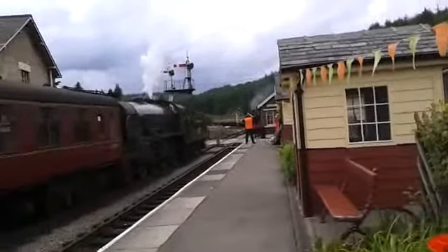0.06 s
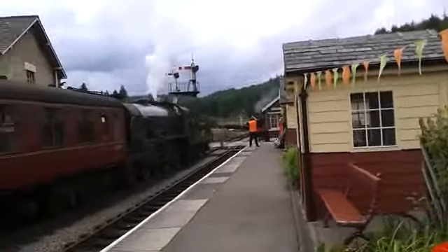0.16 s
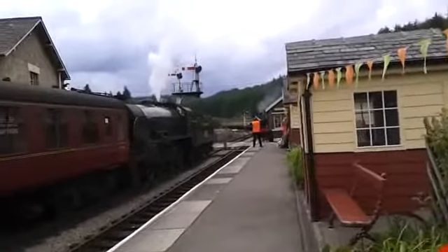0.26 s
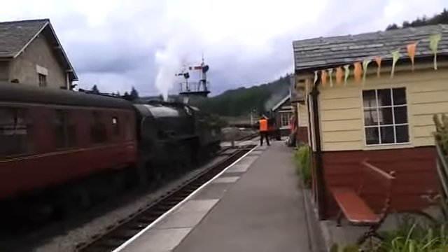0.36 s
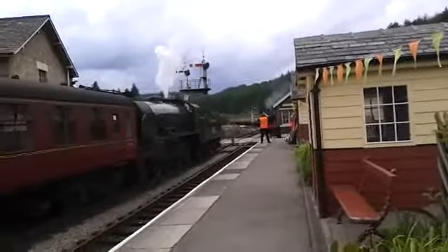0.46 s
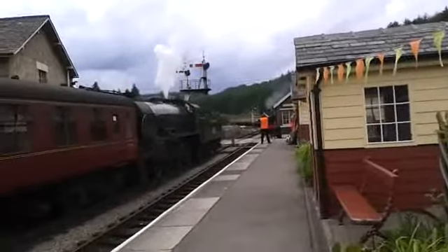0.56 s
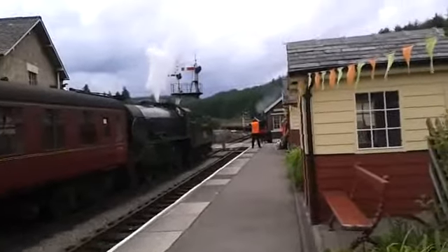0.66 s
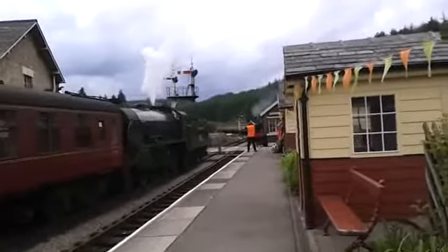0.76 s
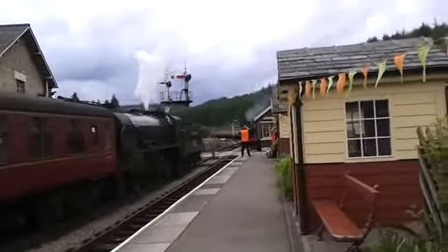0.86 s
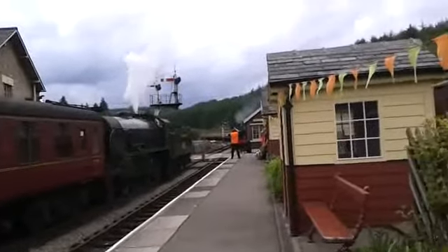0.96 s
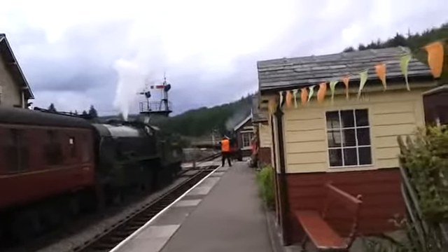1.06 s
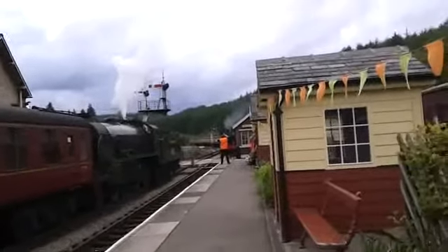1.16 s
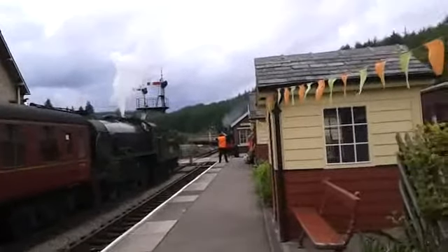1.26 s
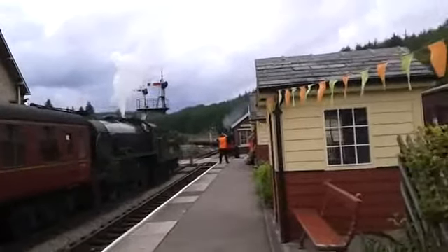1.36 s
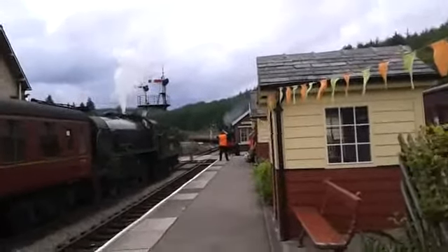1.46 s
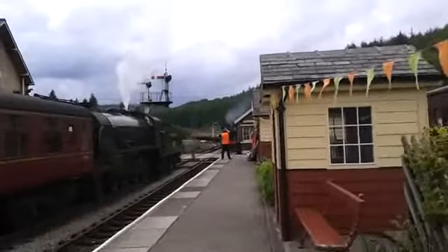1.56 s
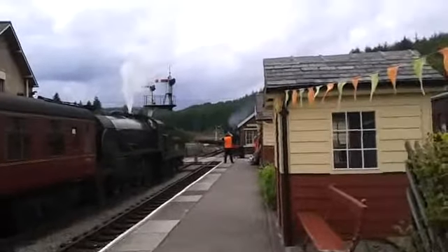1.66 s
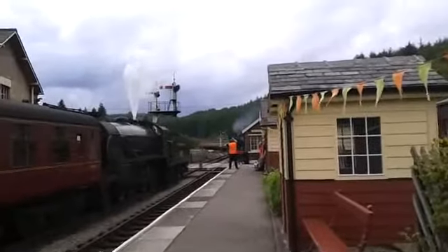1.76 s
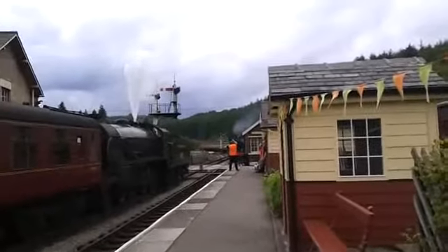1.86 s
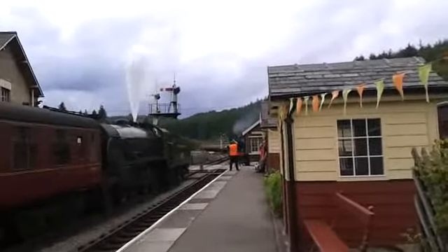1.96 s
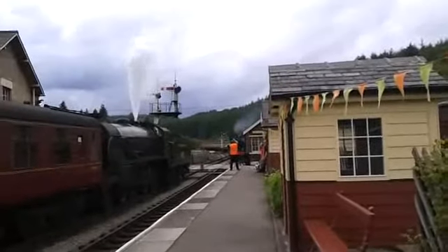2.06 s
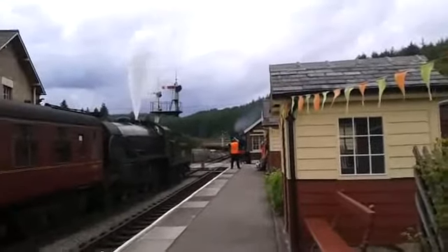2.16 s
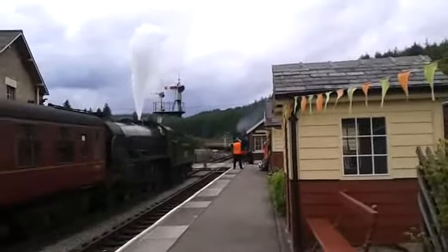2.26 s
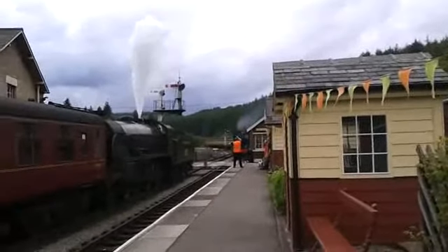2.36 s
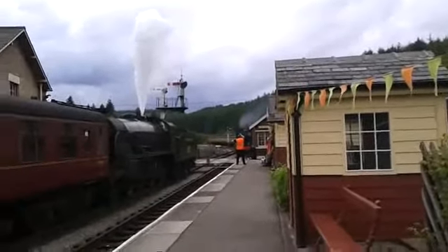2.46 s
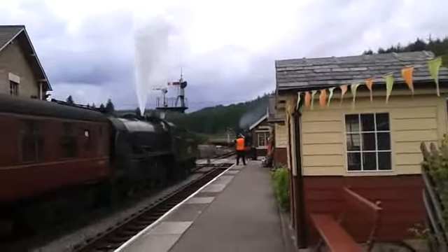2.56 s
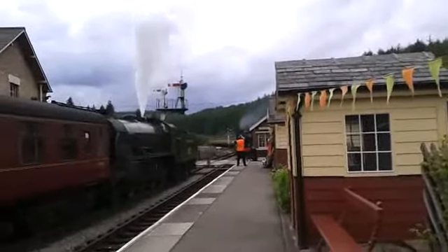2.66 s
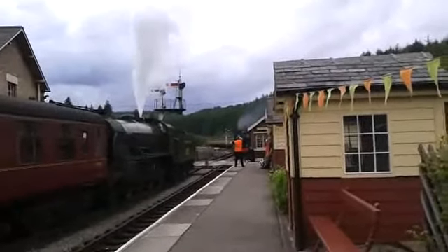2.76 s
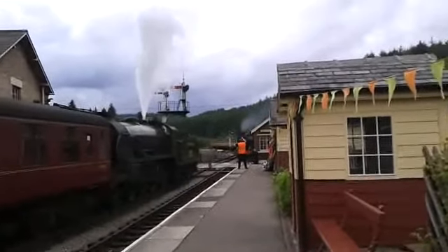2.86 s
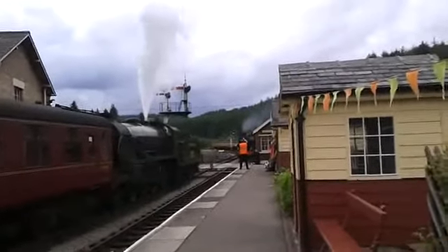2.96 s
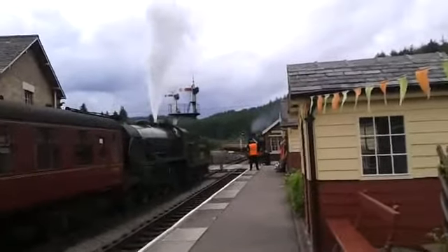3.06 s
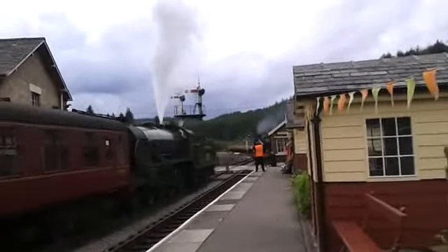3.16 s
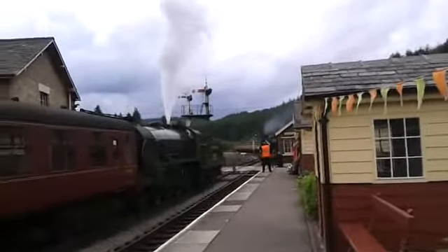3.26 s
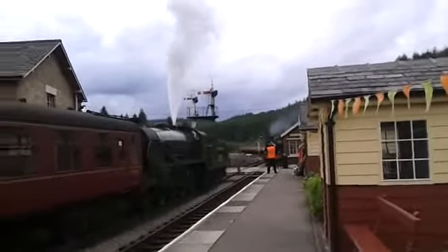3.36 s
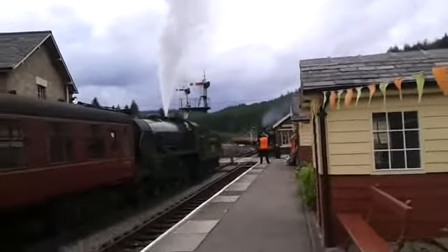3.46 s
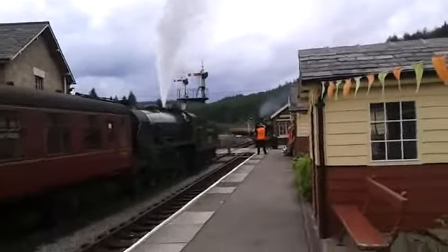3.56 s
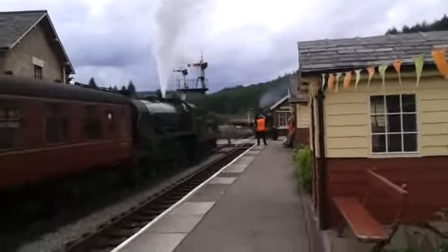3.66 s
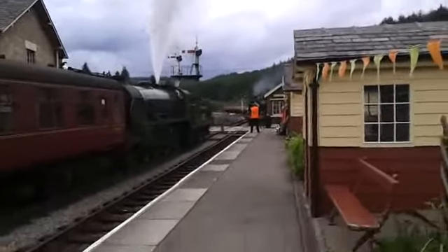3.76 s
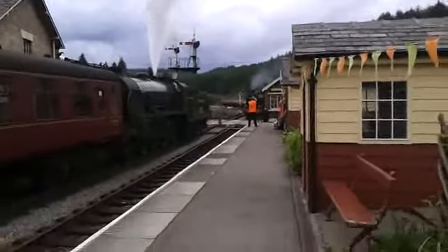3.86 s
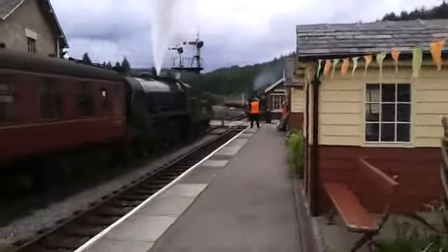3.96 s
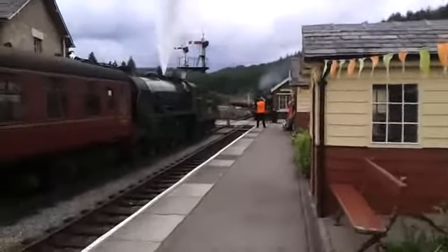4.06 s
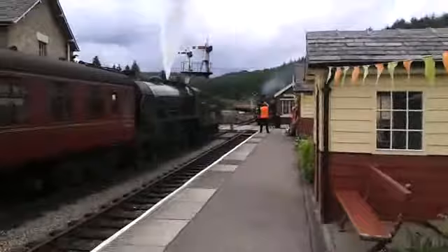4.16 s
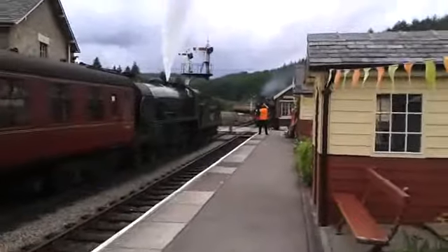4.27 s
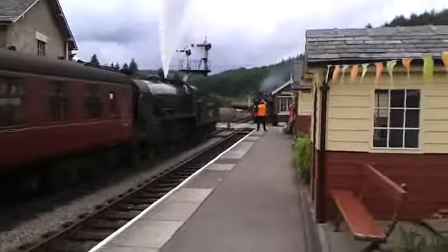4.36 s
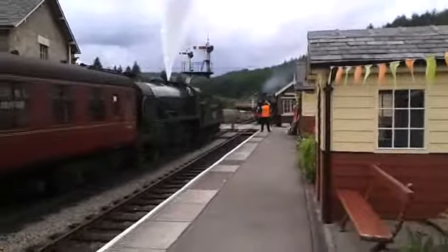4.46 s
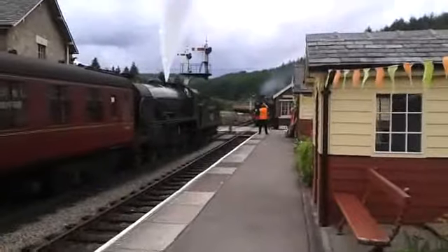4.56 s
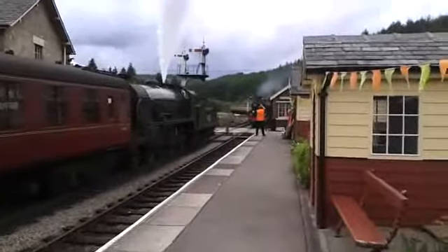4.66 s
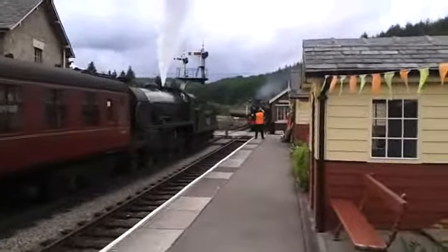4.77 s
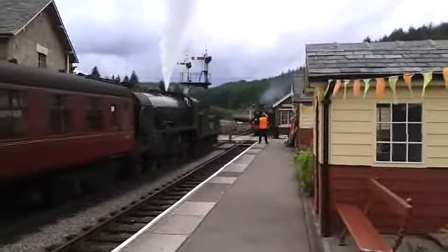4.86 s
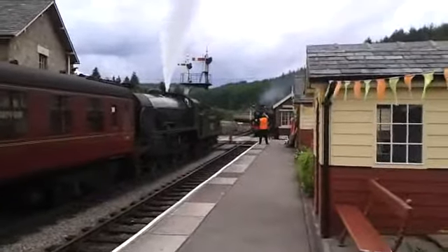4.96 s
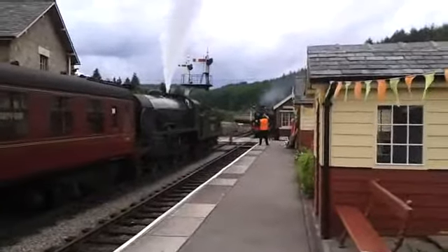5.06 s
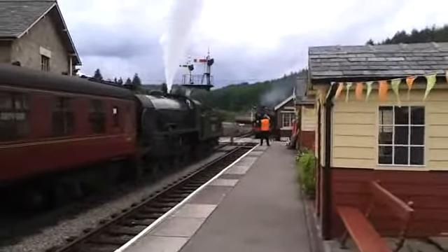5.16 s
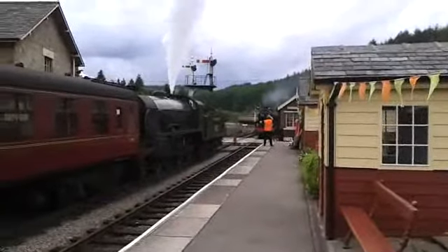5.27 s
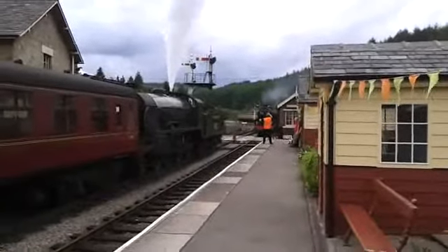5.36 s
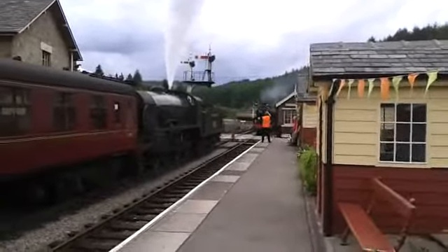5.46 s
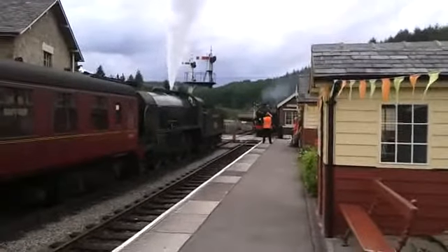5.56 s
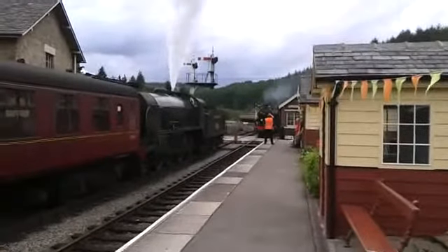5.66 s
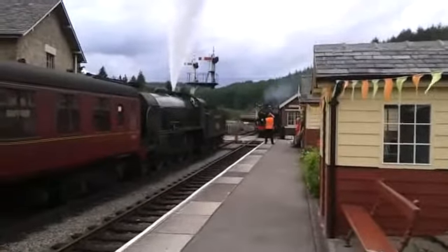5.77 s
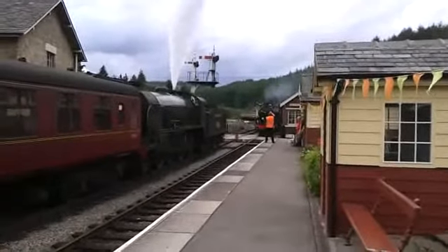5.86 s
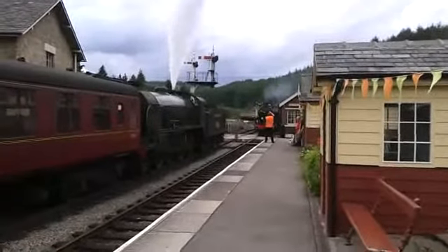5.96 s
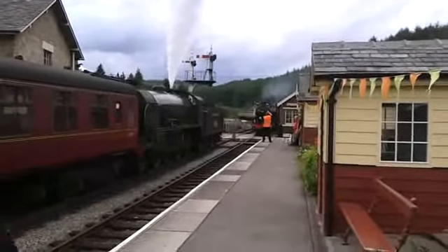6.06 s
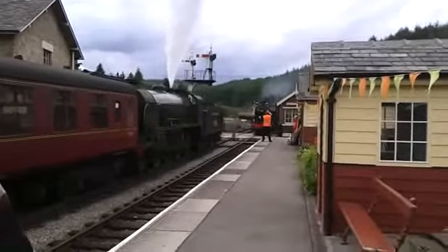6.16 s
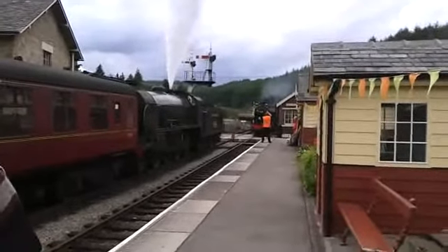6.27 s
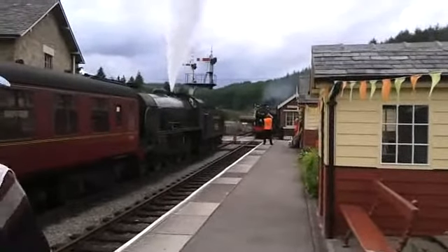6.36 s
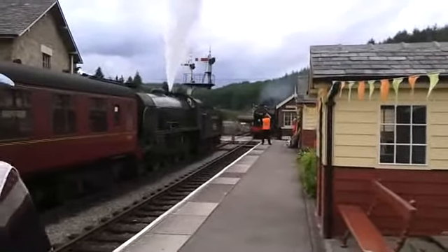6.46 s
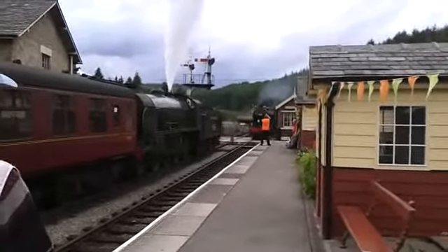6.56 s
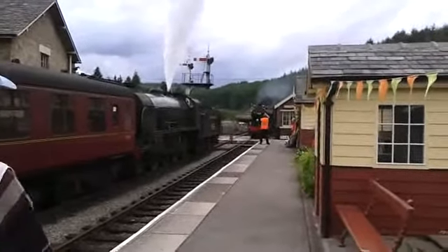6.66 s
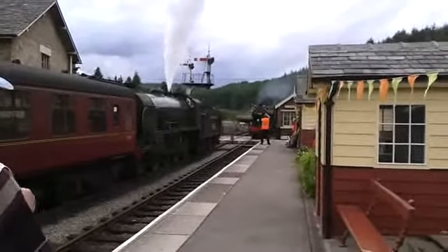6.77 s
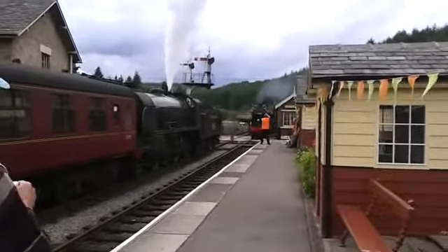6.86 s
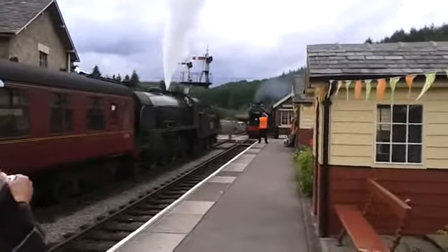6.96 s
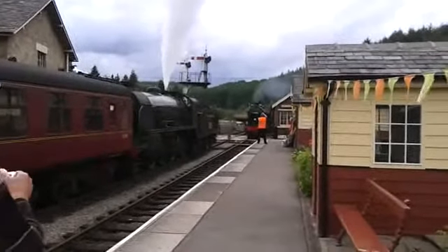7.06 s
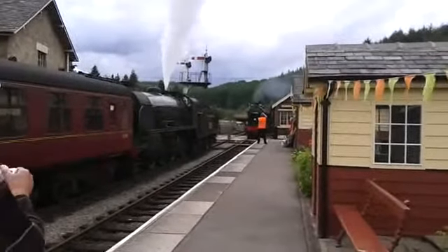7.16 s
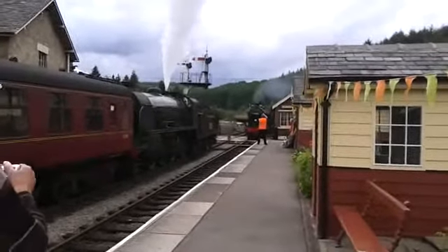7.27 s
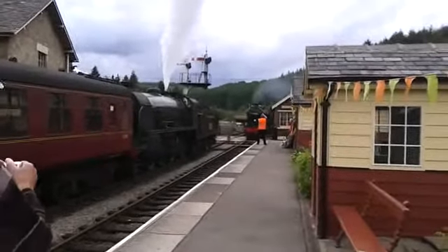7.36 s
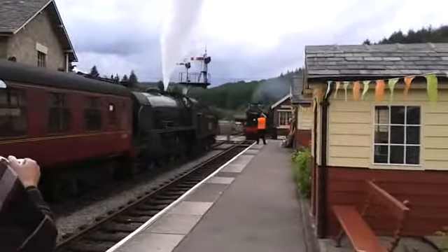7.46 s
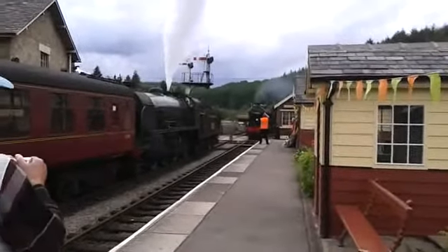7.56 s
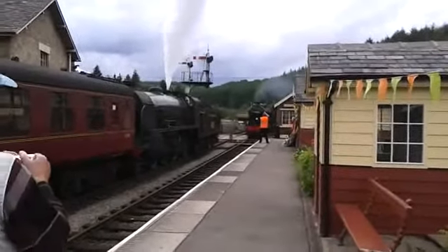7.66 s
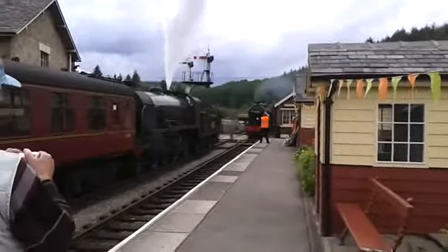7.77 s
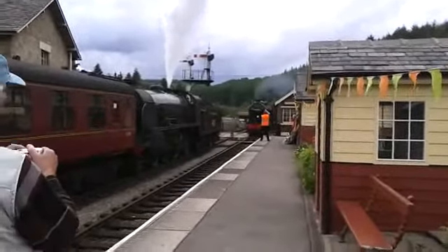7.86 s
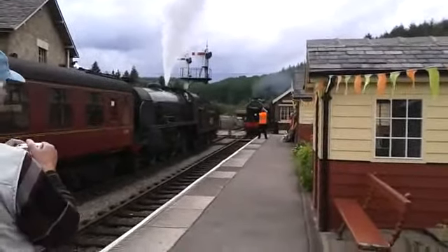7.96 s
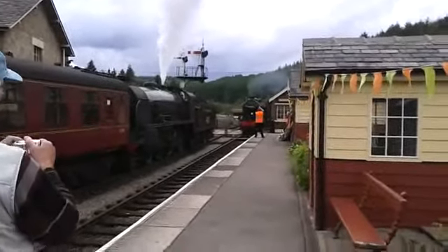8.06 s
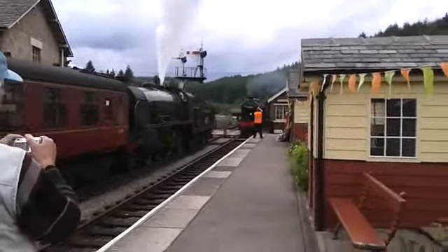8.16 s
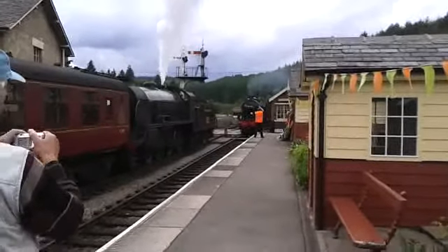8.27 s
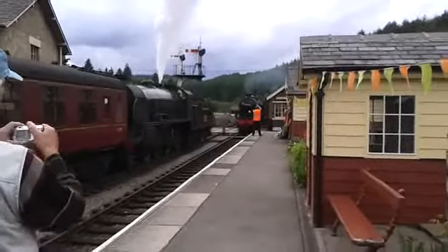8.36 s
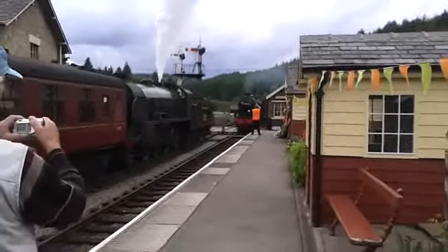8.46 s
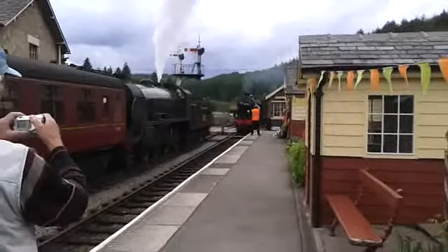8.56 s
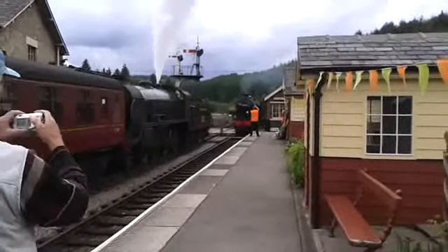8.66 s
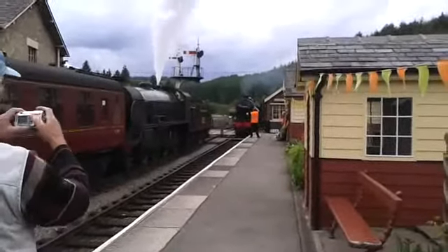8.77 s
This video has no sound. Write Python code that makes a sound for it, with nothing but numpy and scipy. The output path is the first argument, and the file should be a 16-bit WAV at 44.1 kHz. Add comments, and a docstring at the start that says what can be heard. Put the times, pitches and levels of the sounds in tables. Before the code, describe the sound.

A standing steam locomotive simmers softly over a fading rumble, a dull double knock, then safety valves burst into a loud steady steam roar.

```python
"""Down the platform a standing steam locomotive simmers: soft banded hiss with faint tones, over a lumpy low rumble.
Nearby a dull double knock sounds, blows into short modes; the rumble has died away by 1.7 s.
At 1.64 s the safety valves pop open and a far jet of steam roars: smooth bright banded noise with wandering whistles.
Moving air makes its treble swell and sink; its colour then settles, with a few brief soft low tones; the low end is gone.
One microphone feeds both channels, with early echoes and a wandering hollow in the treble."""
import sys
import numpy as np
from scipy import signal
from scipy.fft import rfft, irfft, next_fast_len
from scipy.io import wavfile
from scipy.ndimage import uniform_filter1d, minimum_filter1d

SR = 44100
rng = np.random.default_rng(int(sys.argv[2]) if len(sys.argv) > 2 else 0)


def wav_out(sig):
    """Save sig, one row per channel (or a flat mono array), as 16-bit PCM at SR to the path in sys.argv[1]."""
    wavfile.write(sys.argv[1], SR, np.round(np.clip(np.atleast_2d(sig).T, -1, 1) * 32767).astype(np.int16))


N = 388521
STEP = 64   # samples between the values of a slow control


def from_db(db):
    """Decibels to gain."""
    return 10 ** (np.asarray(db) / 20)


def rms_one(x):
    """Scale to rms 1."""
    return x / np.sqrt(np.mean(x ** 2) + 1e-20)


def clock():
    """Seconds, one value every STEP samples."""
    return np.arange(N // STEP + 2) * STEP / SR


def in_time(rows):
    """Columns of a table that starts with time, one value every STEP samples."""
    s, *columns = np.transpose(rows)
    return [np.interp(clock(), s, column) for column in columns]


def full_rate(slow, size=N):
    """A slow control at every sample."""
    return np.interp(np.arange(size) / STEP, np.arange(len(slow)), slow)


def ramp(start_s, length_s):
    """A share that rises evenly from 0 to 1."""
    return np.clip((clock() - start_s) / length_s, 0, 1)


def drift(rate_hz, count):
    """Rows of slow chance: noise twice through a one-pole low-pass, scaled to spread 1."""
    r = np.exp(-2 * np.pi * rate_hz * STEP / SR)
    white = rng.standard_normal((count, N // STEP + 1002))
    slow = signal.lfilter([1], [1, -2 * r, r * r], white)[:, 1000:]   # the run-in is dropped
    return slow / slow.std(axis=1, keepdims=True)


def at_hz(points, hz):
    """Read a spectrum on a log frequency axis."""
    point_hz, level_db = np.transpose(points)
    return np.interp(np.log(hz), np.log(point_hz), level_db)


def resonance(x, hz, width_hz):
    """Two-pole peak, gain about 1 on top."""
    r = np.exp(-np.pi * width_hz / SR)
    poles = [1, -2 * r * np.cos(2 * np.pi * hz / SR), r * r]
    return signal.lfilter([(1 - r * r) / 2, 0, (r * r - 1) / 2], poles, x)


def whistle(hz, width_hz):
    """Noise twice through a narrow resonance; rms 1."""
    once = resonance(rng.standard_normal(N), hz, width_hz)
    return rms_one(resonance(once, hz, width_hz))


def low_cut(x, hz):
    """A fourth-order high-pass."""
    return signal.sosfilt(signal.butter(4, hz, "high", fs=SR, output="sos"), x)


def bands(low_hz, count, size):
    """Centres and noises of eighth-octave bands; neighbours are unrelated."""
    edges = low_hz * 2 ** (np.arange(count + 1) / 8)
    white = rng.standard_normal((3, size))   # three sources take turns
    noises = []
    for k in range(count):
        band_pass = signal.butter(2, edges[k:k + 2], "band", fs=SR, output="sos")
        noises.append(signal.sosfilt(band_pass, white[k % 3]))
    return np.sqrt(edges[:-1] * edges[1:]), noises


def patches(hz, slow_weight, fast_weight):
    """Turbulent air on the way: a wobble in dB per band, stronger in the treble."""
    # neighbouring bands share the slow wobble, each has its own fast one
    shared = uniform_filter1d(drift(0.23, count=len(hz)), size=3, axis=0)
    wobble = slow_weight * shared + fast_weight * drift(19.5, count=len(hz))
    return wobble * np.sqrt(hz[:, None] / 6000)


def simmer():
    """The valves feathering before they lift: soft banded hiss and faint tones that end together."""
    # colour of the hiss: (frequency [Hz], relative level [dB])
    simmer_colour = [(100, -11), (160, -15), (200, -6.5), (300, -6), (850, -7), (1250, -6.5), (2300, -3),
                     (2800, -8), (3300, -5), (4200, -3), (5000, -10), (5750, -11), (6600, -10.5),
                     (8000, -12.5), (8900, -13.5), (10000, -12.5), (11000, -28.5)]
    # narrow hums and whistles: (frequency [Hz], width [Hz], level [dB])
    simmer_tones = [(124, 9, -55), (275.3, 8.2, -56.5), (835, 360, -39.5), (1630, 300, -34.5),
                    (1750, 81, -43.5)]
    hiss_db, end_s, fade_db_per_s = -28, 1.66, 900   # hiss level ahead of its dip and low cut
    dip_hz, dip_width_hz, dip_depth = 9000, 300, 0.55
    size = 2 * SR   # the hiss is over within two seconds

    hz, noises = bands(90.1, count=56, size=size)
    gains = from_db(at_hz(simmer_colour, hz)[:, None] + patches(hz, slow_weight=-2.0, fast_weight=2.0))
    hiss = rms_one(sum(full_rate(gain, size=size) * noise for gain, noise in zip(gains, noises)))
    hiss = hiss - dip_depth * resonance(hiss, dip_hz, dip_width_hz)
    hiss = np.pad(low_cut(hiss, 102.0), (0, N - size))

    tones = sum(from_db(db) * whistle(hz, width_hz) for hz, width_hz, db in simmer_tones)
    fade_db = -fade_db_per_s * np.clip(clock() - end_s, 0, .2)
    return full_rate(from_db(hiss_db + fade_db)) * hiss + full_rate(from_db(fade_db)) * tones


def rumble():
    """Lumpy noise under 100 Hz with a narrow hum in it, dying away."""
    # course of the lumps: (time [s], level [dB] ahead of the mix and a small chance wobble)
    rumble_lumps = [(0, -44.5), (.52, -47), (.59, -62), (.68, -50), (.81, -54), (.865, -74), (.93, -49),
                    (1.01, -52), (1.065, -74), (1.13, -56), (1.22, -58), (1.26, -70), (1.31, -58),
                    (1.4, -78), (1.65, -76), (1.7, -120)]
    low_band = signal.butter(2, [22, 95], "band", fs=SR, output="sos")
    low = rms_one(signal.sosfilt(low_band, rng.standard_normal(N)))
    hum = whistle(hz=59, width_hz=9.3)
    lumps_db = in_time(rumble_lumps)[0] + 1.5 * drift(4.5, count=1)[0]
    return full_rate(from_db(lumps_db)) * (0.69 * low + 0.63 * hum)


def thud():
    """A dull knock nearby: soft blows ring a few short decaying modes."""
    # the blows: (time [s], strength [dB])
    blows = [(1.345, -28), (1.376, -31)]
    # what rings: (frequency [Hz], level against the blow [dB], time to fall 60 dB [s])
    thud_modes = [(562, -1, 0.1), (855, -1, 0.066), (1150, 2, .04)]
    clicks = np.full(N, 1e-18)   # not quite zero, so the filters stay fast
    for s, db in blows:
        clicks[round(s * SR)] = from_db(db)
    out = np.zeros(N)
    for hz, db, t60 in thud_modes:
        r, w = from_db(-60 / (t60 * SR)), 2 * np.pi * hz / SR
        out += signal.lfilter([0, from_db(db) * np.sin(w)], [1, -2 * r * np.cos(w), r * r], clicks)
    return low_cut(out, 250.0)


def jet_levels():
    """The valves lift: dB of the roar, then of hiss and sizzle against it."""
    # sizzle above 5.6 kHz against the roar, once open: (time [s], level [dB])
    sizzle_course = [(1.75, -0.5), (2.1, -2), (2.7, -3.5), (3.0, -0.5), (3.6, -3), (3.9, -6), (4.2, -2.5),
                     (4.5, -1.5), (4.8, -4), (5.1, -2.5), (5.6, -3), (6.0, 0.5), (6.3, -0.5), (6.6, -2.5),
                     (6.9, -3), (7.5, -5.5), (8.1, -2), (8.4, -2), (8.8, -3)]
    lift_s, lift_rise_s, treble_rise_s = 1.642, 0.037, 0.058
    steady_db, pop_height_db, pop_fade_s = -16.5, 3.5, 0.056
    # hiss of 2.8-5.6 kHz: level against the roar, share of the sizzle's swing, slow loss
    hiss_offset_db, hiss_follows, hiss_sag_db_per_s = 1.59, 0.43, 0.16

    # the roar rises to a pop above its steady level, then sinks back
    pop_db = pop_height_db * np.exp(-np.maximum(clock() - lift_s - lift_rise_s, 0) / pop_fade_s)
    open_db = 40 * np.log10(ramp(lift_s, lift_rise_s) + 1e-5)
    roar_db = steady_db + open_db + pop_db

    # the treble opens later and takes only half of the pop
    treble_open_db = 40 * np.log10(ramp(lift_s, treble_rise_s) + 1e-5)
    late_db = (treble_open_db - open_db - pop_db) / 2
    sizzle_db = in_time(sizzle_course)[0]
    hiss_db = hiss_offset_db + hiss_follows * sizzle_db - hiss_sag_db_per_s * (clock() - lift_s)
    return roar_db, hiss_db + late_db, sizzle_db + late_db


def jet_noise(settled, roar_db, hiss_db, sizzle_db):
    """Banded steam noise: the colour settles, and each of three zones follows its own level."""
    # colour just after opening: (frequency [Hz], relative level per Hz [dB])
    fresh_colour = [(470, -20), (600, -15.5), (900, -7), (1150, -12.5), (1500, -5.5), (1850, -6.5),
                    (2300, -7.5), (2750, -11), (3200, 0), (3800, 1), (4600, 2.5), (5200, -9.5),
                    (5700, -5.5), (6500, -4.5), (8000, -10), (10000, -10), (11000, -19)]
    # colour once settled: (frequency [Hz], relative level per Hz [dB])
    settled_colour = [(470, -15), (550, -8), (680, -10), (850, -6.5), (1500, -2), (2300, -2.5), (2800, -10),
                      (3200, -6), (3500, -7.5), (4100, -4.5), (5350, -11), (5900, -21.5), (6800, -16.5),
                      (8400, -19.5), (9700, -19), (11000, -30)]
    # edges between roar, hiss and sizzle: frequency [Hz]
    zone_edges_hz = 2800, 5600

    hz, noises = bands(413.0, count=39, size=N)
    fresh_db = np.outer(at_hz(fresh_colour, hz), 1 - settled)
    colour = from_db(fresh_db + np.outer(at_hz(settled_colour, hz), settled))
    flicker = from_db(patches(hz, slow_weight=-0.5, fast_weight=1.5))
    zone = np.searchsorted(zone_edges_hz, hz)
    out = np.zeros(N)
    for k, level_db in enumerate([roar_db, roar_db + hiss_db, roar_db + sizzle_db]):
        # power of a white-noise band grows with its width
        power = np.sum(colour[zone == k] ** 2 * hz[zone == k, None], axis=0) * .192 / SR
        zone_gain = from_db(level_db) / np.sqrt(power)
        for band in np.flatnonzero(zone == k):
            out += full_rate(colour[band] * flicker[band] * zone_gain) * noises[band]
    return out


def gliding_whistle(hz, width_hz):
    """A narrow band of noise carried on a moving centre; rms 1."""
    r = np.exp(-np.pi * width_hz / SR)
    in_phase, quadrature = signal.lfilter([1], [1, -2 * r, r * r], rng.standard_normal((2, N)))
    phase = 2 * np.pi * np.cumsum(hz) / SR
    return rms_one(in_phase * np.cos(phase) + quadrature * np.sin(phase))


def jet_whistles(roar_db):
    """Whistling bands of the jet that wander and swell, and open with the roar."""
    # (width [Hz], centre at each of the times [Hz], level at each [dB] if the roar were at its peak)
    whistle_courses = [(150, (1600, 1630, 1720, 1713, 1770), (-22, -29, -23, -21.5, -22.5)),
                       (70, (1961, 2033, 1984, 1958, 1993), (-37, -20, -18, -21.5, -23)),
                       (140, (2174, 2163, 2077, 2080, 2093), (-24, -20.5, -26.5, -31.5, -22)),
                       (100, (2423, 2350, 2330, 2380, 2320), (-27.5, -41, -33, -32, -42)),
                       (420, (4378, 4260, 4160, 4093, 4130), (-17.5, -18, -20, -20.5, -19.5)),
                       (110, (1385, 1352, 1420, 1450, 1480), (-28.5, -26, -43, -48, -35)),
                       (90, (905, 868, 1066, 1060, 1105), (-40, -38, -34, -43, -37))]
    # the times of those courses: time [s]
    whistle_times_s = 2.5, 3.9, 5.1, 6.3, 7.8
    wander = .012   # spread of the centre, as a share of it
    opened_db = roar_db - np.max(roar_db)
    out = np.zeros(N)
    for width_hz, course_hz, course_db in whistle_courses:
        level_db = np.interp(clock(), whistle_times_s, course_db) + opened_db
        level_db = level_db + 0.81 * drift(3.5, count=1)[0]
        centre_hz = np.interp(clock(), whistle_times_s, course_hz) * (1 + wander * drift(1.5, count=1)[0])
        out += full_rate(from_db(level_db)) * gliding_whistle(full_rate(centre_hz), width_hz)
    return out


def wavering_dips(x, settled):
    """Narrow dips in the jet's spectrum: resonances taken away by a wavering share."""
    # (frequency [Hz], width [Hz], fresh depth [0-1], settled depth [0-1]), depths ahead of the waver
    dips = [(972, 85, 0, 0.75), (1164, 90, 0.4, 0), (8540, 230, 0.6, 0.6), (9260, 250, 0.7, 0.6),
            (7430, 150, 0.1, 0.77), (6150, 290, 0.5, .15), (8030, 160, 0.7, 0.4), (10700, 200, 0.4, 0.3),
            (10800, 180, 0.2, 0.8)]
    for hz, width_hz, fresh, late in dips:
        depth = fresh + (late - fresh) * settled + 0.38 * drift(8.6, count=1)[0]
        x = x - full_rate(np.clip(depth, 0, 1)) * resonance(x, hz, width_hz)
    return x


def wavering_edge(x):
    """Slices of the lowest roar sound only while the wandering edge lies below them."""
    # slow course of the roar's lower edge: (time [s], frequency [Hz])
    low_edge = [(1.7, 697), (2.0, 577), (2.5, 623), (3.2, 580), (4.2, 540), (5.6, 537), (5.9, 612),
                (6.3, 576), (6.6, 523), (7.0, 490), (8.8, 510)]
    # borders of the slices: frequency [Hz]
    fringe_edges_hz = 430, 480, 530, 580, 630, 680, 740
    swing_hz, scatter_spread_hz, soft_hz = 35.3, 47, 5

    size = next_fast_len(N)
    spectrum, hz = rfft(x, size), np.arange(size // 2 + 1) * SR / size
    above = [np.clip((hz - edge) / 30 + .5, 0, 1) ** 2 for edge in fringe_edges_hz]
    edge_hz = in_time(low_edge)[0] + swing_hz * drift(12.5, count=1)[0]
    scatter_hz = scatter_spread_hz * drift(7.5, count=len(above))
    out = irfft(spectrum * above[-1], size)[:N]
    for k in range(len(above) - 1):
        part = irfft(spectrum * (above[k] - above[k + 1]), size)[:N]
        share = np.clip((fringe_edges_hz[k] - edge_hz + scatter_hz[k]) / soft_hz + 1, 0, 1)
        smooth_share = uniform_filter1d(uniform_filter1d(share, size=12), size=12)
        out += full_rate(smooth_share) * part
    return out


def jet():
    """The far steam jet: banded noise and whistles, then wavering dips and a wandering lower edge."""
    settled = ramp(start_s=2.94, length_s=1.35)
    roar_db, hiss_db, sizzle_db = jet_levels()
    steam = jet_noise(settled, roar_db, hiss_db, sizzle_db) + jet_whistles(roar_db)
    return wavering_edge(wavering_dips(steam, settled))


def low_tones():
    """Brief soft-edged low tones during the roar: sines under a squared-sine swell."""
    # (time a quarter of the way in [s], peak level [dB], frequency [Hz])
    low_tone_list = [(2.049, -28, 455), (2.945, -31, 433), (3.99, -31.5, 293), (6.87, -33, 453),
                     (7.807, -34, 429), (8.427, -31, 367), (8.459, -33, 413)]
    length_s = 0.0404
    out, t = np.zeros(N + SR), np.arange(round(length_s * SR)) / SR
    swell = np.sin(np.pi * t / length_s) ** 2
    for s, db, hz in low_tone_list:
        start = round((s - length_s / 4) * SR)
        out[start:start + len(t)] += from_db(db) * swell * np.sin(2 * np.pi * hz * t)
    return out[:N]


def early_echoes(x):
    """Delayed, weaker copies off platform and walls."""
    # (delay [s], level [dB])
    echo_list = [(.0029, -37), (.0081, -21), (.0107, -15)]
    return x + sum(from_db(db) * np.pad(x, (round(s * SR), 0))[:N] for s, db in echo_list)


def wandering_hollow(x):
    """A hollow in the treble that wanders as the listener moves: a moving band is taken away."""
    hollow_course = [(0, 5750, 1), (.4, 5800, .95), (.8, 5870, 0.82), (1.2, 6060, 0.74), (1.5, 5680, 0.91),
                     (1.9, 5620, 0.79), (2.5, 6000, .75), (3.2, 5800, .75), (3.45, 6150, 1),
                     (4.0, 5760, 0.83), (4.5, 5740, 1.2), (5.0, 5640, 0.73), (5.3, 5640, 0.86),
                     (6.2, 5720, 1.6), (6.8, 5600, 1.1), (7.2, 5630, 0.82), (7.7, 5700, 0.75),
                     (8.3, 5720, 0.88), (8.8, 5840, 1)]
    width_hz, waver_hz = 360, 60
    centre_hz, depth = in_time(hollow_course)
    centre_hz = full_rate(centre_hz + waver_hz * drift(14.0, count=1)[0])
    depth = np.clip(depth + .15 * drift(9.0, count=1)[0], 0, 1)
    # shift the centre to 0 Hz, keep what lies near it, shift back
    carrier = np.exp(2j * np.pi * np.cumsum(centre_hz) / SR)
    low_pass = signal.butter(4, width_hz / 2, fs=SR, output="sos")
    band = signal.sosfiltfilt(low_pass, x * carrier.conj())
    return x - full_rate(depth) * 2 * np.real(band * carrier)


def scene():
    """One microphone in both channels; echoes and hollow act on simmer and jet alone."""
    steam = wandering_hollow(early_echoes(simmer() + jet()))
    return np.tile(steam + rumble() + thud() + low_tones(), (2, 1))


def steep(x, hz):
    """A sharp-edged low-pass."""
    return signal.sosfilt(signal.ellip(12, .5, 85, hz, "low", fs=SR, output="sos"), x)


def limiter(x):
    """Gain dips smoothly around each peak above the limit."""
    limit, smooth_samples = 1.03, 61
    gain = minimum_filter1d(limit / np.maximum(np.abs(x), limit), size=2 * smooth_samples)
    return x * uniform_filter1d(uniform_filter1d(gain, size=smooth_samples), size=smooth_samples)


def record(dry):
    """The microphone's top ends, a limiter holds the peaks, tips clip at full scale, the band is cut."""
    air_top_hz, cutoff_hz = 11130, 12100
    heard = np.clip(limiter(steep(dry[0], air_top_hz)), -1, 1)
    return np.tile(steep(heard, cutoff_hz), (2, 1))


dry = scene()
out = record(dry)
wav_out(out)
```